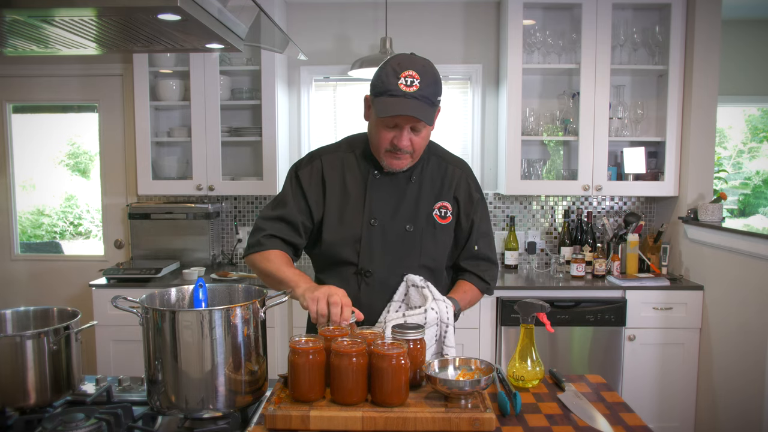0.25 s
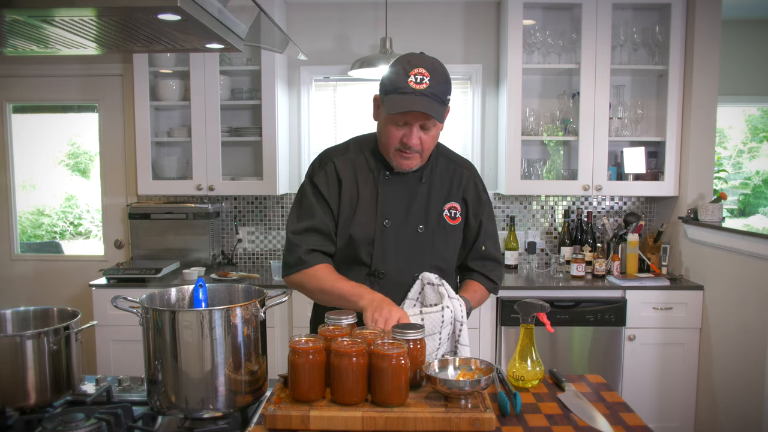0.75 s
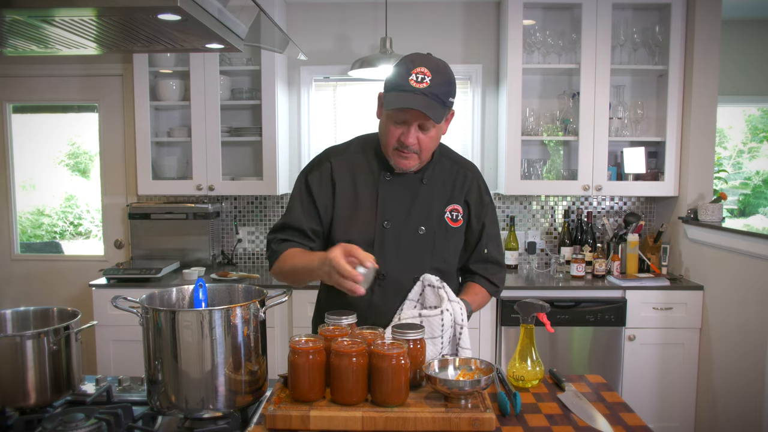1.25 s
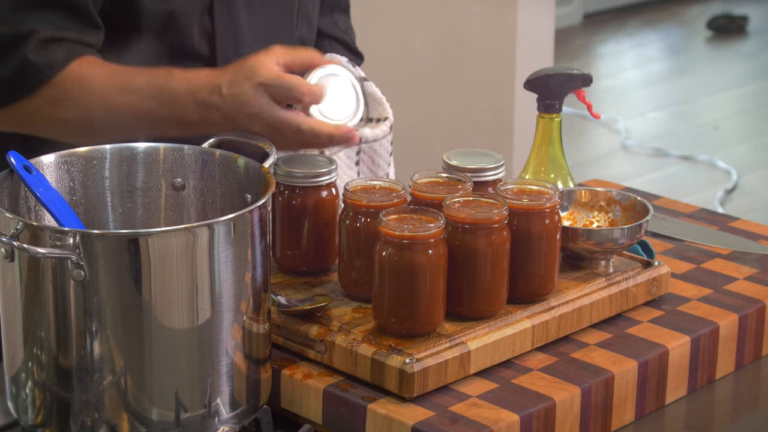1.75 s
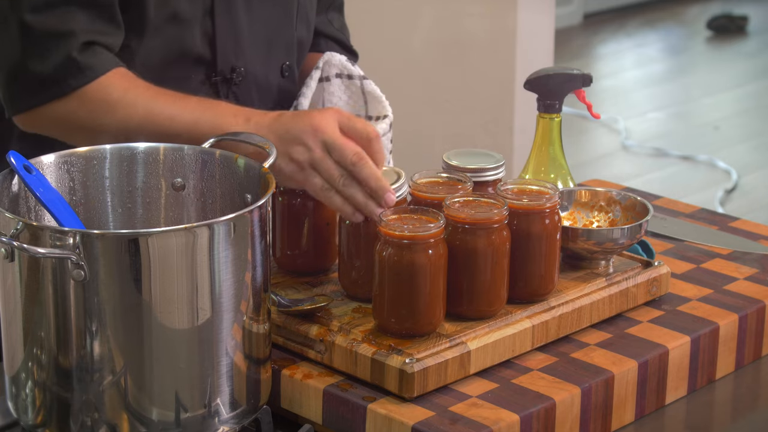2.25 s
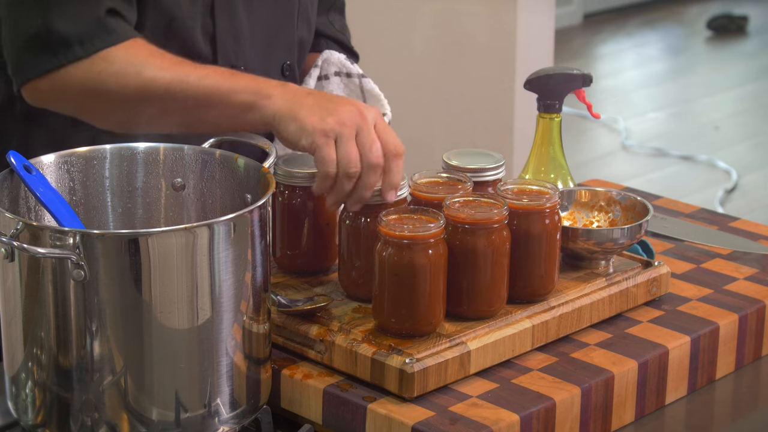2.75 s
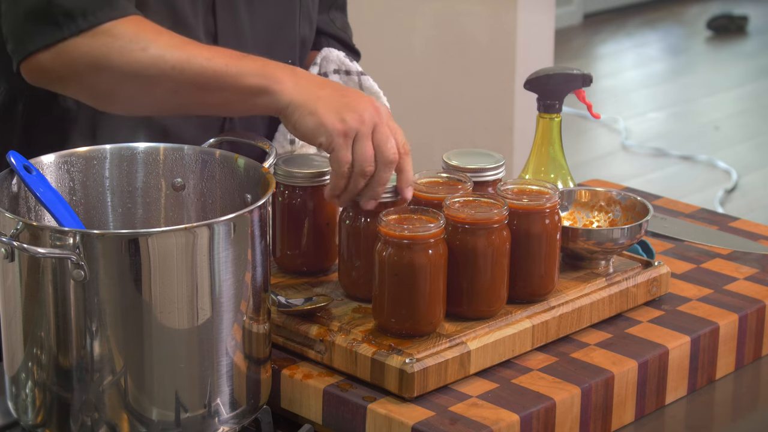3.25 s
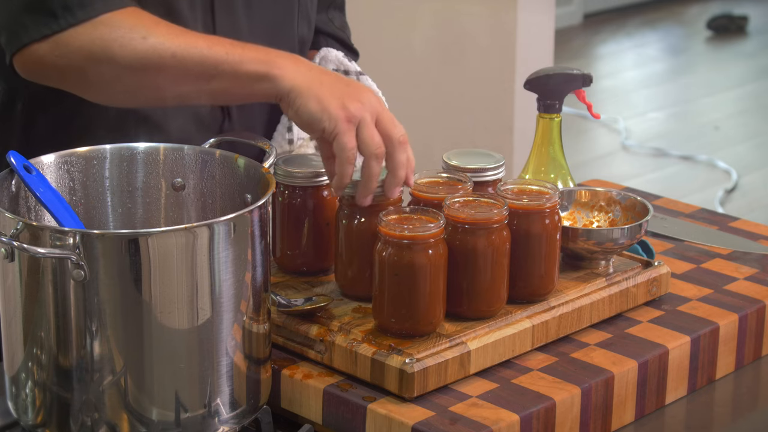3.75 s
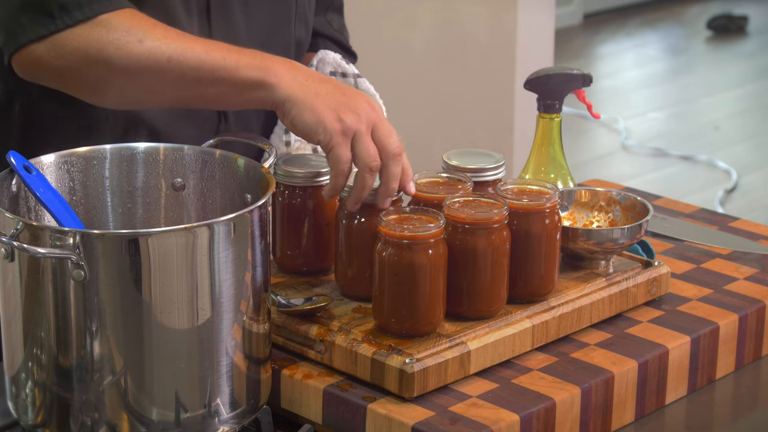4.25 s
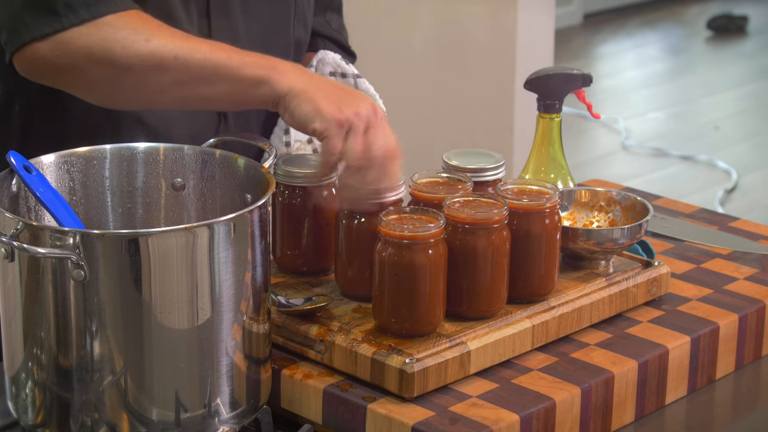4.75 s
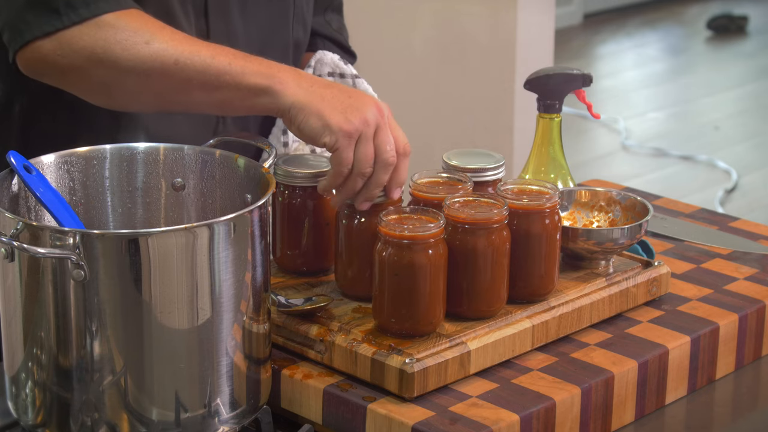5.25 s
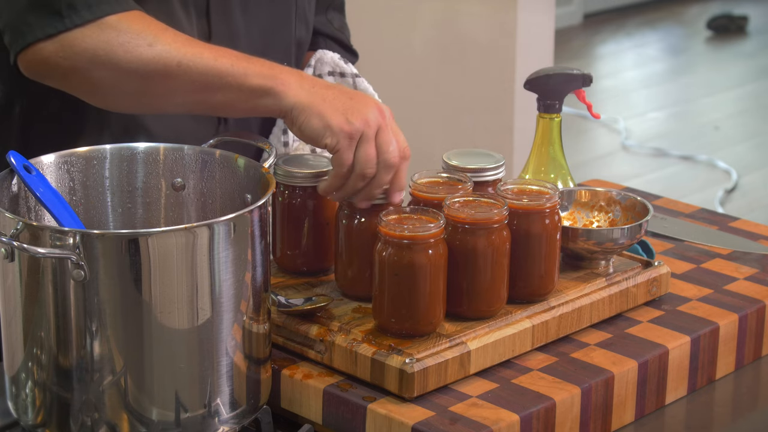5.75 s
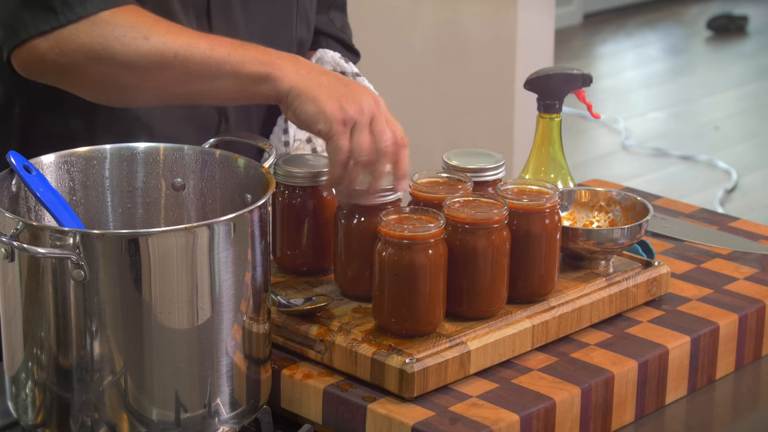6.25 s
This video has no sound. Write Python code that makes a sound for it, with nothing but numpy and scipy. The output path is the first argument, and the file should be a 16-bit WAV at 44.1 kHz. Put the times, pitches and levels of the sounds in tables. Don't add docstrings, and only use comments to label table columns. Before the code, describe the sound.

Close, slightly thin sound from a microphone pinned to a jacket in a kitchen. First a strong woody thump and rebound as a filled jar is set down, then fabric swishes and soft bumps. A tin lid clatters onto glass, slides, rubs and turns in bursts of scraping and small ringing clinks, until the jar knocks the board gently. Low extractor hum lies far behind.

```python
import sys
import numpy as np
from scipy import signal
from scipy.fft import rfft, irfft
from scipy.io import wavfile
from scipy.ndimage import uniform_filter1d

SR = 44100
rng = np.random.default_rng(int(sys.argv[2]) if len(sys.argv) > 2 else 0)


def volts_from_db(level):
    exponent = np.asarray(level, float) / 20
    return 10 ** exponent


def wrap_up_sound(samples):
    columns = np.atleast_2d(samples).T
    tamed = np.clip(columns, -1, 1)
    steps = np.round(tamed * 32767).astype(np.int16)
    wavfile.write(sys.argv[1], SR, steps)


N = 285768
BAND_HZ, JAR_HZ = 2066, 600


def evened(x):
    return x / np.sqrt(np.mean(x ** 2) + 1e-20)


def read(points, hz):
    f, value = np.transpose(points)
    return np.interp(np.log(hz + 1), np.log(f + 1), value)


def add(mix, s, sound):
    part = mix[round(s * SR):][:len(sound)]
    part += sound[:len(part)]


def coloured(x, spectrum):
    gain = volts_from_db(read(spectrum, np.fft.rfftfreq(len(x), 1 / SR)))
    return evened(irfft(rfft(x) * gain, len(x)))


def dull(x, hz):
    return signal.sosfilt(signal.butter(3, hz, fs=SR, output="sos"), x)


def resonate(x, hz, width):
    r = np.exp(-np.pi * width / SR)
    if np.ndim(hz) == 0:
        return 2 * signal.lfilter([1 - r], [1, -r * np.exp(2j * np.pi * hz / SR)], x).real
    turn = np.exp(2j * np.pi * np.cumsum(hz) / SR)
    return 2 * (turn * signal.lfilter([1 - r], [1, -r], x / turn)).real


def struck(contact, hz, width):
    sound = resonate(contact, hz, width)
    return sound / abs(sound).max()


def ring(t, hz, db, t60, rise=0.0018):
    return volts_from_db(db - 60 * t / t60) * (1 - np.exp(-t / rise)) * np.sin(2 * np.pi * hz * t)


def grit(count, per_s, spread_db):
    size = volts_from_db(spread_db * np.minimum(rng.exponential(1, count), 5))
    return evened(size * rng.standard_normal(count) * (rng.random(count) < per_s / SR))


def tent(t, peak, swell, stop):
    return np.maximum((peak - t) / swell, (t - peak) / stop)


def free(band_hz):
    return np.exp(-((band_hz - BAND_HZ) / 180.0) ** 2)


# (f/Hz, width/Hz, level/dB)
LID = [(2770, 160, 0), (3650, 140, 3), (4800, 220, -3), (5500, 220, -3), (7680, 200, -12)]
# (t/s, band f/Hz)
GRIP = [(2.1, 1813), (2.3, 1780), (2.55, 1870), (3.57, 1620), (3.61, 1950), (3.76, 1450), (3.9, 1545),
        (4.05, 1670), (4.1, 1930), (4.22, 1966), (4.47, 1540), (4.56, 1850), (4.95, 1893), (5.056, 1440),
        (5.41, 1323), (5.62, 1870), (6.13, 1760), (6.21, 1994)]
# (t/s, band level/dB, tin level/dB, jar body level/dB, jar body f/Hz)
CENTRE_TOUCHES = [(0.8689, -46, 5, -21.5, 571), (2.111, -37.5, -6, -6, 1318), (2.1262, -44, -11, 2, 1360),
                  (2.1419, -27, -10.5, -13, 1000), (2.1594, -53, -10, -16, 1400),
                  (2.176, -35, -24, -16, 1310), (2.2072, -44.5, -27, -6, 950), (2.3427, -53, 4.5, 6, 990),
                  (2.5346, -51, -7, 13.5, 532), (2.9936, -67.5, 11, 19.5, 559),
                  (3.0049, -63.5, -14, 21, 522), (3.1764, -57, -20, -8, 600), (3.4904, -35.5, -11, -5, 560),
                  (3.5053, -38.5, -28, 1, 860), (3.6254, -52, -12, 4.5, 453), (4.9434, -51, 11, -7, 607),
                  (5.7687, -40, -30, -19, 867), (5.8441, -40, -9, -3.5, 437), (6.126, -45.5, -38.5, 6, 506),
                  (6.1789, -44, -26, -5, 587), (6.2064, -38, -15, -7, 490)]
SHOULDER_TOUCHES = [(2.2856, -36, -17, -14, 580), (2.6194, -53, 7, 16, 592), (2.93, -52.5, -8.5, 1.5, 900),
                    (3.0567, -56, -11.5, 2.5, 530), (3.6075, -49, -26.5, 5.5, 736),
                    (3.685, -56.5, -3, -18, 650), (3.9745, -39, -27, -25, 1400),
                    (4.33, -62.5, -11.5, 11, 601), (4.858, -37.5, -17.5, -16, 545),
                    (4.9272, -70.5, 9, 14, 1370), (4.9774, -51.5, 3.5, 1.5, 563),
                    (5.264, -49.5, 0, -2, 510), (5.326, -66, 0, 6, 990), (5.4106, -51, 7, 13, 957),
                    (5.5893, -53, -4, -24, 555), (5.6894, -49.5, -16.5, -7, 607), (5.782, -44.5, 1, 5, 490)]
BEAD_TOUCHES = [
    (3.7625, -58.5, 12.5, 5, 1284),
    (4.0769, -58.5, 11, 11.5, 1130),
    (4.2228, -46.5, -13, -10, 603),
    (4.5487, -65.5, 6, 11, 654),
    (5.463, -47, -4, -5.5, 567),
    (6.1017, -48.5, -4.5, -1, 518),
]
SKIRT_TOUCHES = [
    (2.3114, -49, 1, -7, 585),
    (2.5454, -40.5, -4, 4.5, 1100),
    (2.6018, -38.5, 0.5, 7.5, 609),
    (3.4296, -53, -4.5, -2.5, 640),
    (4.568, -42, -7.5, -5.5, 616),
    (5.06, -39.5, 1, -20, 570),
    (5.1352, -50.5, -9, 0, 500),
]
EDGE_TOUCHES = [
    (2.3116, -71, 15.5, 0.0081, 600),
    (3.7625, -78, 35.5, 0.0014, 600),
    (4.9436, -71.5, 24, 0.0035, 600),
]


def clinks():
    out, t = np.zeros(N), np.arange(SR // 8) / SR
    tables = (CENTRE_TOUCHES, SHOULDER_TOUCHES, BEAD_TOUCHES, SKIRT_TOUCHES, EDGE_TOUCHES)
    touches = [(*row, mode[0]) for rows, mode in zip(tables, LID) for row in rows]
    for s, db, tin_db, body_db, body_hz, tin_hz in touches:
        noise = rng.standard_normal((3, len(t)))
        share_db = 9.74 * rng.standard_normal(len(LID))
        band_hit, tin_hit, jar_hit = noise * volts_from_db(-60 * t / 0.033) * (1 - np.exp(-t / 0.000052))

        hz = np.interp(s, *np.transpose(GRIP))
        band = struck(struck(band_hit, hz, 600), hz, 190)
        band += 0.5 * free(hz) * struck(band_hit, BAND_HZ, 29)

        lid = sum(volts_from_db(0.059 * m + d) * struck(tin_hit, f, 3.1 * w) for (f, w, m), d in zip(LID, share_db))
        crack = struck(struck(tin_hit * volts_from_db(-60 * t / 0.01), 6000, 1900), 3100, 2100)
        mode = struck(struck(tin_hit, tin_hz, 900), tin_hz, 200)
        tin = 0.5 * mode + 0.11 * lid + 0.4 * crack

        body = struck(struck(jar_hit, body_hz, 1050), body_hz, 92) + 0.4 * struck(jar_hit, JAR_HZ, 57)
        clink = dull(band, 2350) + volts_from_db(tin_db + 4.5) * tin + volts_from_db(body_db + 4.5) * body
        add(out, s - 0.0005, volts_from_db(db) * clink)
    return dull(out, 6400)


# (t/s, peak level/dB)
TICKS = [(2.096, -46), (2.105, -32), (2.1406, -30), (2.2888, -48), (2.3112, -42), (2.425, -47),
         (2.5436, -34.5), (2.6001, -28), (2.9932, -56), (3.491, -48), (3.6063, -49), (3.763, -47),
         (3.8921, -55.5), (3.8953, -53), (4.0385, -54), (4.0603, -50), (4.0762, -44), (4.2224, -45),
         (4.3288, -50), (4.5637, -51), (2.534, -46), (4.9424, -44), (5.059, -36), (5.2627, -50),
         (5.409, -62), (5.4633, -47), (5.585, -55)]
# (f/Hz, level/dB per Hz)
CLICK = [(2500, -17), (4800, -1.5), (9000, -2), (15800, -6.5)]


def ticks():
    out, t = np.zeros(N), np.arange(1024) / SR
    for s, db in TICKS:
        add(out, s, volts_from_db(db - 9.5) * coloured(rng.standard_normal(1024), CLICK) * volts_from_db(-60 * t / 0.02))
    return out


# (f/Hz, level/dB per Hz)
FIZZ = [(5180, -26), (8200, -6), (9590, -3), (10500, -8), (12200, 1), (13600, -7), (15800, -6)]


def scrape(peak, db, fade, jar_db, tin_db, grain_db, rise):
    t = peak - 0.4 * rise + np.arange(SR // 2) / SR
    band_db = db - 60 * tent(t, peak, rise, fade)
    band_hz = np.interp(t, *np.transpose(GRIP))
    slips, fine = grit(len(t), 2000, 2.6), grit(len(t), 7000, 2.0)
    clumps = volts_from_db(1.6 * evened(uniform_filter1d(rng.standard_normal(len(t)), 250)))
    slips, fine = slips * clumps, fine * clumps

    band = resonate(resonate(slips, band_hz, 494), band_hz, 642)
    band += 8.7 * free(band_hz) * resonate(slips, BAND_HZ, 63)
    body = 1.6 * resonate(slips, JAR_HZ, 80)
    body += resonate(resonate(slips, 1110, 660), 1110, 870)

    grip_db = 3.0 * rng.standard_normal(len(LID))
    tin = sum(volts_from_db(m + d) * resonate(fine, hz, w) for (hz, w, m), d in zip(LID, grip_db))
    tin += 2.5 * resonate(fine, 3140, 1100)
    tin = signal.sosfilt(signal.butter(2, 2400, "high", fs=SR, output="sos"), tin)

    metal = evened(dull(band, 1900)) + volts_from_db(tin_db) * evened(dull(tin, 13200))
    metal += volts_from_db(tin_db + grain_db) * coloured(fine, FIZZ)
    sound = volts_from_db(band_db - 5.5) * metal + volts_from_db(band_db + jar_db - 3.0) * evened(dull(body, 923))
    return t[0], sound * np.minimum((t[-1] - t) * 10, 1)


SEATING = [
    (2.103, -34, 0.9, -18.5, -11),
    (2.295, -44, 0.5, 1.5, -7.5),
    (2.435, -51, 0.5, 0, -1.5),
    (2.544, -50, 0.34, 6, -0.5),
    (2.602, -52, 0.98, -2, -3),
]
RUBS = [
    (3.762, -75, 0.24, 8, 20),
    (4.1, -56.5, 0.36, 10.5, 4.5),
    (4.47, -56, 0.053, -7.5, -9.5),
    (4.566, -53.5, 0.086, 1.5, -12.5),
]
TWISTS = [(3.0, -63, 1.46, 6, -11.5), (3.51, -40, 0.16, -11, -21), (3.55, -64.5, 1.6, 9.5, -4.5),
          (3.89, -35.5, 0.51, -11, -8.5), (4.22, -69, 1.15, 11.5, 2.5), (4.858, -64, 0.15, 11.5, 4),
          (4.952, -57.5, 0.56, 11, 4), (5.056, -49.5, 0.39, 6, -4.5), (5.17, -64, 1.9, 6.5, -4.5),
          (5.408, -67, 0.42, 15.5, -2), (5.645, -57.5, 0.89, 6, -18), (5.775, -50.5, 0.24, 11, -15),
          (6.105, -49.5, 0.73, -1.5, -12), (6.132, -40, 0.31, -9, -25), (6.2, -51.5, 0.63, 9.5, -4)]


def turning():
    out = np.zeros(N)
    # strokes, fine grain under the tin in dB, time to climb 60 dB in s
    for rows, grain_db, rise in ((SEATING, -9, 0.045), (RUBS, -20, 0.15), (TWISTS, -20, 0.04)):
        for row in rows:
            add(out, *scrape(*row, grain_db, rise))
    return out


# (t/s, f/Hz, level/dB, t60/s)
PINGS = [(2.09, 2750, -49.5, 0.37), (2.101, 3740, -46, 0.27), (2.103, 4790, -45.5, 0.19),
         (3.763, 2890, -53, 0.048), (3.899, 2770, -43.5, 0.15), (4.0, 1550, -58, 0.24),
         (2.139, 5540, -52, 0.047), (2.14, 3600, -43, .06), (2.157, 2053, -30, 0.044),
         (2.175, 2010, -34, 0.058), (2.2, 1973, -36, 0.075), (2.313, 7600, -59, .12),
         (2.419, 5100, -58, 0.38), (2.43, 3580, -63, 0.46), (2.601, 5400, -48, 0.044),
         (6.2, 5300, -55.5, 0.11), (2.655, 3680, -69, 0.34), (3.49, 1650, -31.5, 0.046),
         (3.506, 1647, -37, 0.067), (3.52, 1653, -42, .09), (3.545, 1680, -52, .1), (3.565, 1710, -54, .12),
         (3.607, 3900, -60, .03), (3.621, 5300, -57, 0.027), (3.898, 1516, -36, 0.14),
         (3.935, 1394, -36, 0.069), (3.95, 1470, -53, 0.049), (3.975, 1600, -48, 0.034),
         (3.9, 5750, -70, 0.23), (3.9, 7800, -73.5, 0.14), (4.548, 4380, -51.5, 0.051),
         (4.557, 3610, -52.5, 0.071), (4.565, 5540, -69, 0.11), (4.944, 4800, -49, 0.16),
         (4.943, 7760, -68, 0.072), (4.955, 1090, -41.5, 0.057), (4.977, 910, -54, .1),
         (5.048, 5540, -52, .05), (5.058, 5360, -41, 0.072), (5.059, 2540, -44.5, 0.081),
         (5.075, 3670, -51, .06), (5.41, 3570, -48.5, 0.12), (5.41, 4800, -49, 0.061),
         (5.465, 2070, -48.5, 0.069), (5.766, 2050, -42, 0.11), (5.765, 900, -38.5, 0.1),
         (5.8, 880, -39.5, 0.086), (5.804, 563, -33, 0.038), (5.82, 540, -44, 0.082),
         (5.843, 2040, -42, 0.071)]
# (t/s, f/Hz, level/dB, t60/s)
MORE_PINGS = [(2.102, 2026, -26.5, .05), (2.544, 1694, -34, 0.035), (3.895, 2943, -51, 0.092),
              (2.112, 2100, -38, .03), (2.125, 2000, -30, 0.075), (2.15, 1930, -37.5, .03),
              (3.64, 5110, -56, 0.022), (3.763, 5840, -47, .03), (3.882, 1438, -52, .1), (4.957, 4820, -59, .03),
              (4.978, 3960, -48, .05), (4.958, 2060, -45, 0.035), (5.133, 1300, -50, .03),
              (5.463, 4750, -58, .03), (5.466, 1284, -45, 0.033), (5.588, 2080, -47.5, 0.11),
              (5.69, 3380, -58, 0.047), (5.781, 5900, -49.5, 0.033), (5.796, 1800, -41, 0.066),
              (5.86, 1850, -58, 0.043), (6.125, 1765, -42.5, 0.085), (6.207, 1770, -44, 0.067),
              (6.098, 1410, -59, .15), (6.203, 7760, -59, 0.087), (6.25, 2360, -55, .1)]
# (t/s, f/Hz, level/dB, t60/s, rise/s)
NOTES = [(.25, 1105, -48, 0.26, 0.0034), (.236, 969, -4.5, 0.019, 0.0011), (.26, 1524, -38, 0.94, 0.0054),
         (.314, 797, -17.5, 0.096, 0.0056), (.348, 820, -37, .06, .005), (.374, 806, -27.5, 0.12, .006),
         (.395, 1127, -8.5, 0.031, 0.0013), (.396, 816, -8.5, 0.043, 0.0017),
         (.396, 298, -15.5, 0.13, 0.0028), (.41, 592, -32, 0.41, 0.0081), (.41, 497.4, -26, 0.22, 0.0035),
         (.41, 1567, -38.5, 0.42, .004), (.42, 788, -36.5, 0.8, .006), (.42, 1068, -37, 0.61, .006),
         (.55, 796, -34, 0.072, .01), (6.215, 1116, -40, 0.18, .005), (6.246, 826, -23, 0.044, 0.0012),
         (6.258, 424, -44, 0.081, 0.0017), (6.27, 644, -49, 0.11, .004), (6.26, 1058, -42, 0.16, 0.0037),
         (6.285, 256.5, -29.5, 0.069, 0.0031), (6.33, 610, -37, 0.05, .004), (6.37, 835, -46, 0.18, .008)]


def rings():
    out, t = np.zeros(N), np.arange(SR // 4) / SR
    waver_db, waver_cycles, slip_rad = 5.0, 25, 1.5
    loose = np.minimum(t / 0.026, 1)
    tin = [(*row, 0.0015) for row in PINGS + MORE_PINGS]
    for s, hz, db, t60, rise in [*NOTES, *tin]:
        smooth = min(int(waver_cycles * SR / hz), 500)
        slips = evened(uniform_filter1d(rng.standard_normal(len(t)), smooth))
        level = volts_from_db(db - 60 * t / t60 + waver_db * slips * loose) * (1 - np.exp(-t / rise))
        step = slip_rad * np.sqrt(hz / BAND_HZ) * slips[::-1] * loose
        tone = np.sin(2 * np.pi * hz * t + step)
        add(out, s, level * tone * np.minimum((t[-1] - t) * 20, 1))
    return out


# (peak t/s, level/dB, 20
# dB swell/s, 20 dB stop/s)
SKATES = [
    (.54, -58, 0.096, 0.06),
    (.69, -68, .05, .06),
    (.86, -60, 0.08, .04),
    (1.27, -61.5, .06, .04),
    (2.108, -50.5, 0.023, 0.08),
    (2.44, -67, 0.038, 0.15),
    (3.9, -67, 0.023, 0.15),
    (4.1, -70, 0.033, 0.123),
    (4.95, -63, 0.015, 0.2),
    (6.1, -73, .01, .08),
]


def skates():
    t, fine, width = np.arange(N) / SR, grit(N, 9000, 2.0), 1300
    grain = resonate(resonate(fine, 12300, width), 12300, 2 * width)
    grain += 0.83 * resonate(resonate(fine, 14700, width), 14700, 2 * width)
    level = sum(volts_from_db(db - 20 * tent(t, s, swell, stop)) for s, db, swell, stop in SKATES)
    return level * evened(grain)


# (t/s, peak level/dB, sharpness level/dB, loudest board note f/Hz, its level/dB)
KNOCKS = [(0.234, -5, -21.5, 1093, -20), (0.238, 0, -60, 798, -6.5), (0.252, -12, -41, 304, 0),
          (0.281, -32.5, -37, 278, 10), (0.317, -35, -28, 870, -13), (0.395, -2.5, -27.5, 337, -24),
          (0.41, -9.5, -51, 296, -4), (0.444, -28.5, -45, 297, 10.5), (0.565, -42, -40, 860, 13),
          (6.247, -28, -51, 612, 10), (6.251, -22.5, -55, 440, 7.5), (6.26, -33, -49, 395, 11),
          (6.274, -39.5, -46, 649, 17), (6.288, -56, -48, 436, -4), (6.334, -37, -45, 258, 7.5)]
# (f/Hz, level/dB, t60/s)
BOARD = [(258, 5, 0.13), (296, 5.5, 0.3), (388, -3, 0.58), (490, -3.5, 0.5), (533, -10.5, 0.4),
         (592, 0, 0.309), (770, -5.5, 0.28), (1080, -12, 0.4), (1584, -20.5, 0.36)]
# (f/Hz, level/dB per Hz)
BLOW = [(35, -44.5), (75, -13.5), (205, -11), (314, -1.5), (509, -6.5), (615, -10), (950, -3.5),
        (1250, -14), (1650, -14.5), (2210, -21), (2560, -19.5), (9000, -78), (11700, -98.5), (19800, -120)]


def knocks():
    out, t = np.zeros(N), np.arange(SR // 3) / SR
    for s, db, sharp_db, note_hz, note_db in KNOCKS:
        noise = rng.standard_normal(len(t))
        share_db = 1.2 * rng.standard_normal(len(BOARD))
        top = evened(dull(dull(resonate(noise, 2700, 2100), 3900), 5500))
        blow = coloured(noise, BLOW) + volts_from_db(sharp_db + 8.0) * top
        blow *= (1 - np.exp(-t / 0.0026)) ** 2 * (volts_from_db(-60 * t / 0.027) + volts_from_db(-19 - 60 * t / 0.19))

        board = sum(ring(t, hz, m + d, 0.38 * t60, 0.0045) for (hz, m, t60), d in zip(BOARD, share_db))
        board = board * volts_from_db(4.0 * evened(uniform_filter1d(noise[::-1], size=300)))
        note = ring(t, note_hz, note_db, 0.038, 0.00087)
        add(out, s - 0.0015, volts_from_db(db) * (volts_from_db(-3.5) * blow + volts_from_db(-22.0) * board + note))
    return out


# (t/s, f/Hz, level/dB, t60/s)
GLASS = [
    (0.24, 3270, -48.5, 0.37),
    (.237, 12500, -57, 0.04),
    (.398, 6480, -52, 0.3),
    (.398, 8050, -53, 0.15),
    (0.4, 3300, -48.5, .2),
]


def jar_rims():
    out, t = np.zeros(N), np.arange(SR // 3) / SR
    for s, hz, db, t60 in GLASS:
        add(out, s, ring(t, hz, db, t60))
    return out


# (t/s, rumble level/dB)
CLOTH = [(0.0, -57), (.23, -73), (.6, -42), (.888, -51.5), (1.0, -60.5), (1.386, -52), (1.84, -55.5),
         (2.0, -95), (2.17, -60.5), (2.56, -57.5), (3.2, -65), (3.55, -60), (4.2, -58), (4.59, -71),
         (4.99, -60), (5.61, -71), (6.03, -81), (6.14, -71)]
# (f/Hz, level/dB per Hz)
RUMBLE = [(18, -37), (30, -8.5), (133, 3), (210, 2.5), (477, -3.5), (718, -28), (1080, -46.5),
          (1190, -25.5), (1500, -19.5), (1950, -47.5), (3300, -120)]


def cloth_drag():
    level = volts_from_db(np.interp(np.arange(N) / SR, *np.transpose(CLOTH)))
    return level * coloured(grit(N, 900, 2.0), RUMBLE)


# (peak t/s, level/dB, 20 dB
# swell/s, 20 dB stop/s)
SLEEVE = [(.094, -74.5, 0.17, 0.073), (0.201, -83, 0.0069, 0.013), (0.239, -75, 0.013, 0.047),
          (.53, -55.5, 0.31, 0.2), (.68, -56, 0.047, 0.038), (0.72, -53, 0.08, 0.015),
          (0.867, -61.5, 0.22, 0.077), (0.999, -75.5, 0.48, 0.41), (1.269, -69.5, 0.37, 0.041),
          (1.436, -70.5, 0.24, 0.062), (1.579, -59, 0.078, 0.027), (1.725, -72, 0.5, 0.078),
          (1.86, -76.5, 0.3, 0.035), (0.116, -66.5, .003, .006), (.197, -75.5, .002, .004),
          (5.765, -75, .08, .01)]
# (f/Hz, level/dB per Hz)
SWISH = [(290, -16), (500, 2), (709, -1.5), (1360, -9), (1470, -8.5), (2200, -10.5), (2700, -14),
         (3260, -15.5), (10400, -24.5), (14800, -25.5), (16200, -30.5)]


def sleeve_swish():
    t = np.arange(N) / SR
    level = sum(volts_from_db(db + 11.0 - 20 * tent(t, s, swell, stop)) for s, db, swell, stop in SLEEVE)
    return level * coloured(grit(N, 9000, 0.86), SWISH)


# (t/s, peak level/dB, f/Hz, cycles)
THUMPS = [(0.689, -24.5, 347, 0.87), (0.727, -32.5, 131, 0.79), (0.86, -37.5, 146, 0.77),
          (1.207, -50, 251, 9.5), (1.57, -32, 187, 1.8), (1.718, -51, 100, 1.9), (1.801, -48.5, 185, 3.2),
          (1.819, -45.5, 153.3, 2.4), (4.104, -33, 210.6, 1), (4.289, -46, 221, 1.5),
          (4.819, -39.5, 180, 1.54)]
# (t/s, peak level/dB, f/Hz, cycles)
SWAYS = [
    (.27, -37, 77.5, 3.8),
    (1.581, -41, 93, 1.4),
    (4.108, -41.5, 84, 0.75),
    (6.289, -48, 71.3, 2.6),
]


def cloth_bumps():
    out, t = np.zeros(N), np.arange(SR // 10) / SR
    for s, db, hz, cycles in [*THUMPS, *SWAYS]:
        u = t * hz / cycles
        add(out, s - 0.002, volts_from_db(db + 11.5) * u * np.exp(-1.6 * u * u) * np.sin(2 * np.pi * cycles * u))
    return out


# (f/Hz, level/dB per Hz)
FAN = [(15, -47), (25, -24.5), (124, 6), (201, -1.5), (286, 6.5), (548, -0.5), (941, -11), (2060, -15.5),
       (2430, -20), (3640, -19.5), (5620, -22), (9930, -28), (12300, -23.5), (14900, -27.5), (16200, -35.5)]


def fan():
    swell = evened(uniform_filter1d(rng.standard_normal(N), 3000))
    return volts_from_db(-59.5 - 2.5 + 1.3 * swell) * coloured(rng.standard_normal(N), FAN)


# (f/Hz, t60/s)
KITCHEN = [(125, 0.78), (400, 0.49), (1000, 0.48), (3000, 0.59), (8000, 0.39)]


def kitchen(x):
    taps = np.zeros(SR)
    at = np.arange(200, SR - 20, 20)
    taps[at + rng.integers(0, 20, len(at))] = rng.choice([-1., 1.], len(at))
    hz, t, z = signal.stft(taps, SR, nperseg=256)
    decay = volts_from_db(-60 * t / read(KITCHEN, hz)[:, None])
    tail = signal.istft(z * decay, SR, nperseg=256)[1]
    return signal.fftconvolve(x, tail / np.linalg.norm(tail))[:N]


def scene():
    turns = turning()
    board = knocks() + jar_rims()
    lid = clinks() + ticks()
    near = cloth_drag() + sleeve_swish() + cloth_bumps() + fan()
    left = rings()
    sent = volts_from_db(-9.0) * lid + volts_from_db(-12.0) * turns + volts_from_db(-12.0) * left + volts_from_db(-7.0) * board
    return (lid + turns + left + board + kitchen(sent) + near + skates())[None]


def band_limit(x):
    return signal.sosfilt(signal.butter(12, 15850, fs=SR, output="sos"), x)


def record(dry):
    thin = signal.sosfilt(signal.butter(4, 55, "high", fs=SR, output="sos"), dry)
    thin = thin - (0.44 * resonate(thin[0], 10500, 1000))[None]
    thin = signal.oaconvolve(thin, signal.firwin(255, 15850, fs=SR)[None], "same")
    return band_limit(thin)


dry = scene()
out = record(dry)
wrap_up_sound(out)
```